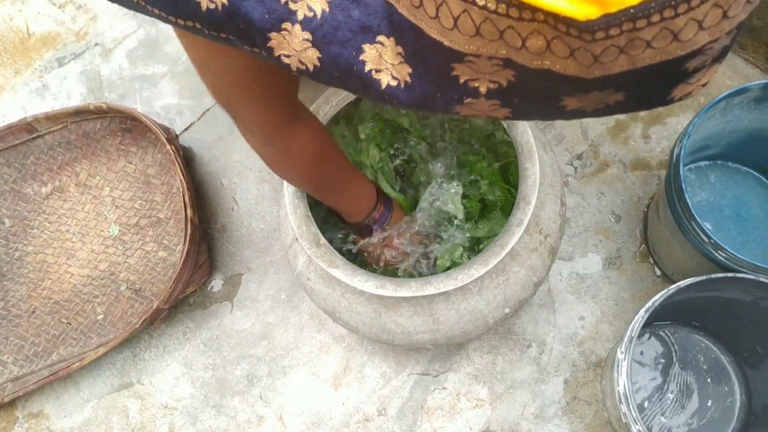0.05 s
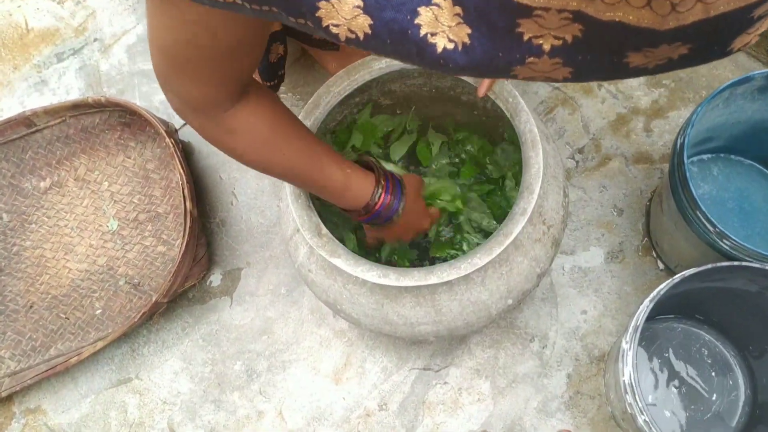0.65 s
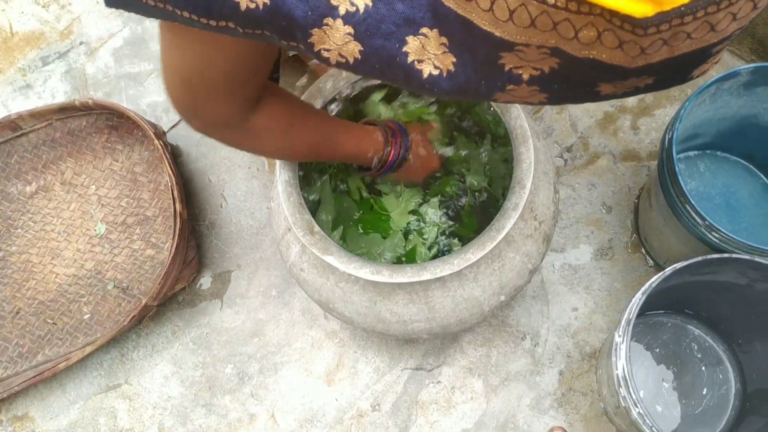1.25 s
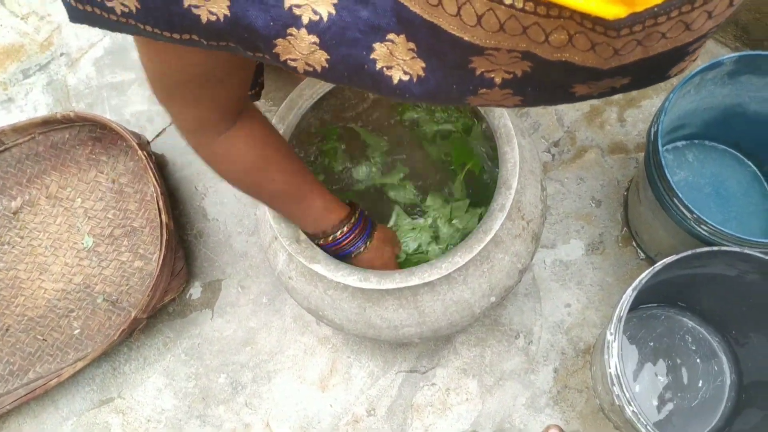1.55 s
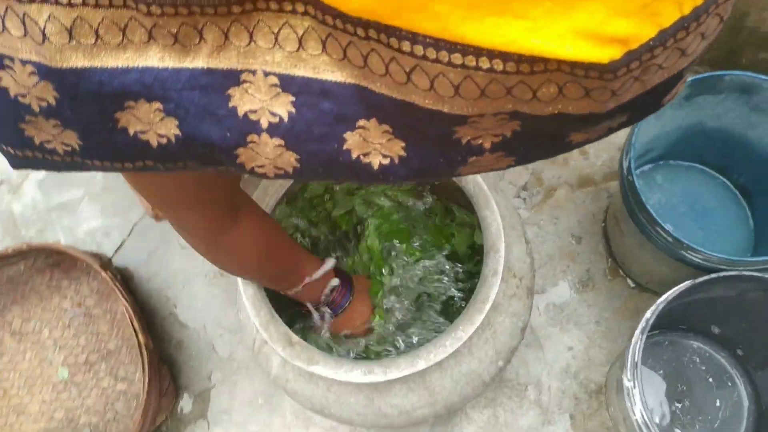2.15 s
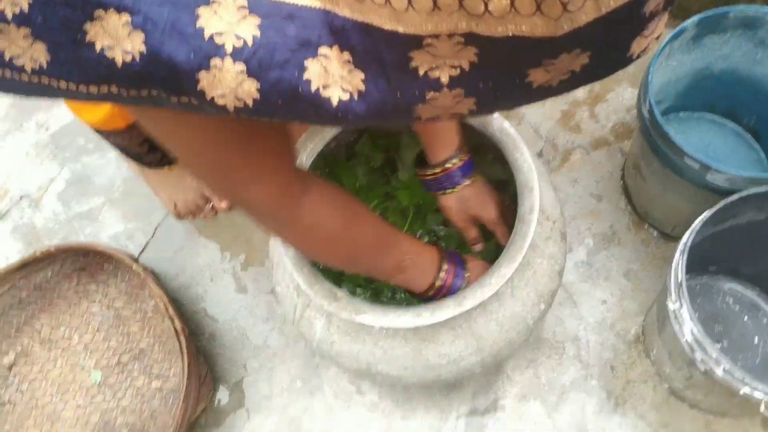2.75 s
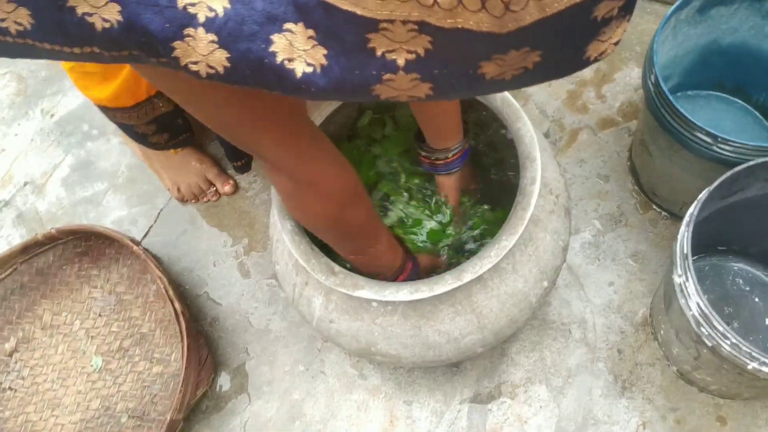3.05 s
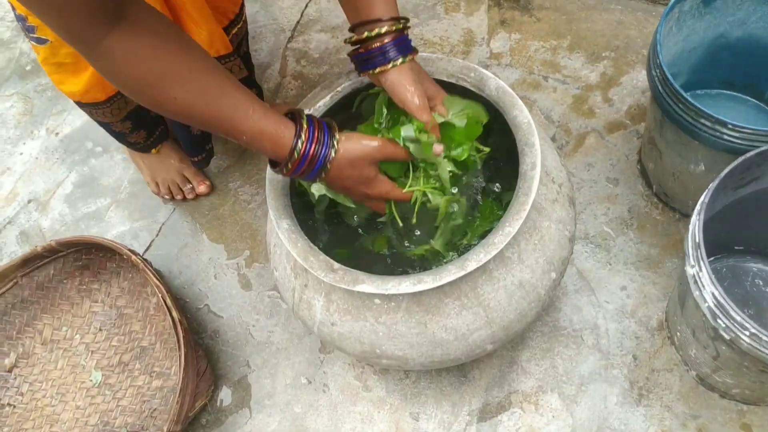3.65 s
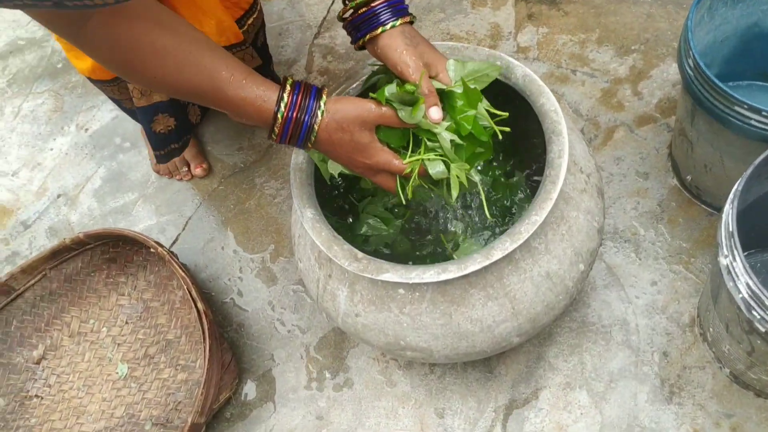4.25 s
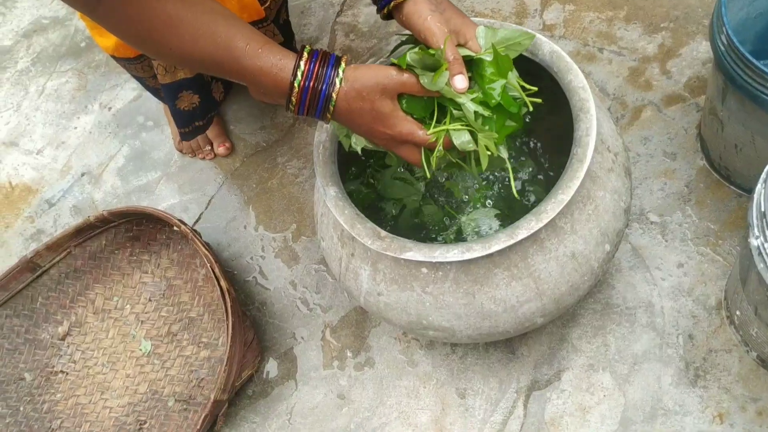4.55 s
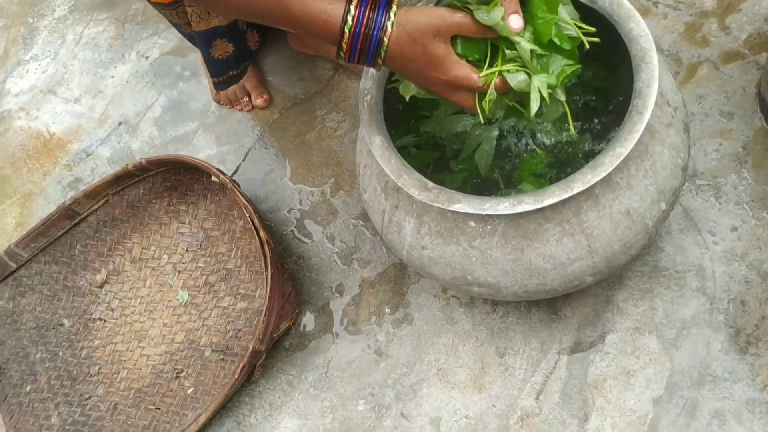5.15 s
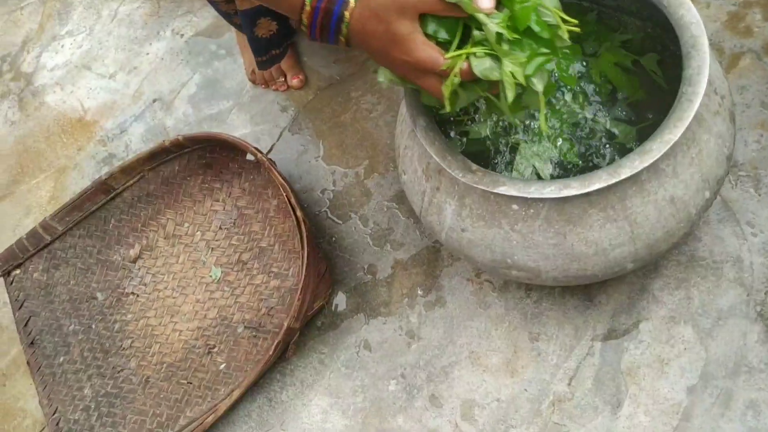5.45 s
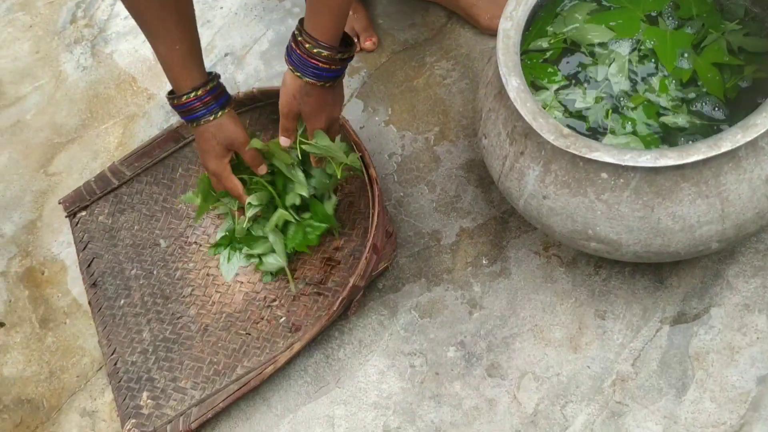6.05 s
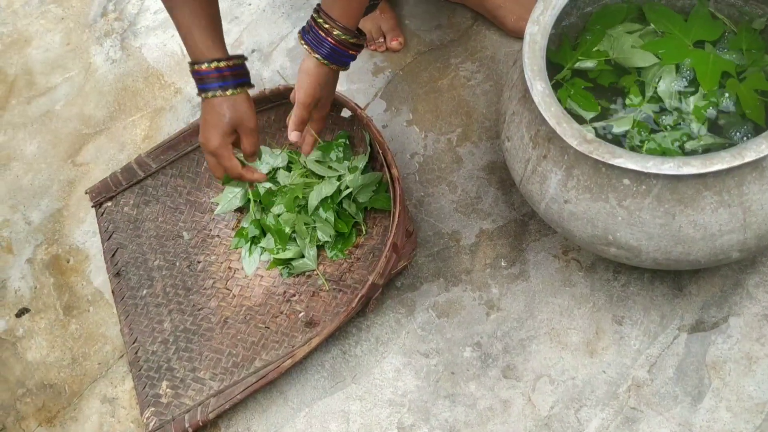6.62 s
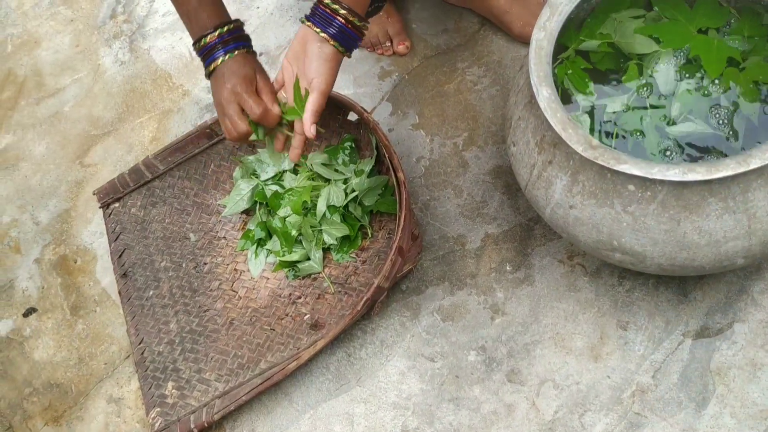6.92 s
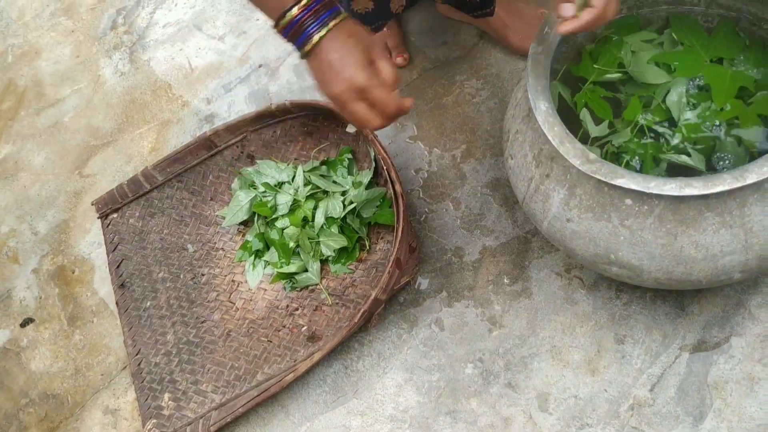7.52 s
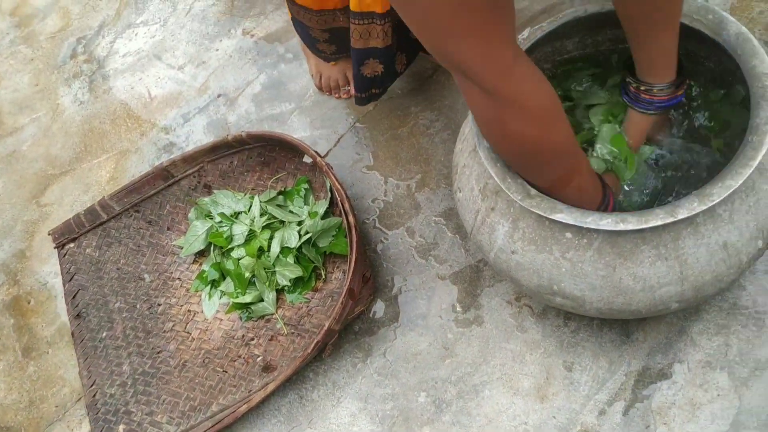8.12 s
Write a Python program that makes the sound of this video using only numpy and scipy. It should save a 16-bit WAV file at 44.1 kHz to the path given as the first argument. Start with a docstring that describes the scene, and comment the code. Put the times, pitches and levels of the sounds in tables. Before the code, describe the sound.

From the start, hands swish leaves in a large metal pot of water, heard close up in a yard over a low rumble and hiss. Uneven surges of bubbling, plops and bright splashes make the pot ring hollowly, with the loudest splashes near clipping. Thin bangles clink at about 1 and 2.9 seconds. Deeper gulps and a dull heave of water come between 3 and 3.6 seconds. Water then spatters back into the pot from a lifted bunch, thinning after 5 seconds to a few drips. At about 6.2 seconds the wet leaves land on a wicker tray with a short rustle. A quieter stretch follows, with faint leaf brushing, soft taps on the tray and bright bangle clinks and slides between 7 and 7.9 seconds. At 8 seconds the hands plunge back in with a loud, gurgling splash.

```python
"""Washing leaves in a metal pot

Hands swish leaves in a big pot of water in a yard; bubbles, spray and splashes set the pot ringing.
A dripping bunch is lifted out and dropped on a wicker tray. Wet bangles clink as the hands are
shaken, then the hands plunge back in. The close microphone clips on the loudest splashes."""
import sys
import numpy as np
from scipy import signal
from scipy.fft import rfft, irfft, next_fast_len
from scipy.io import wavfile
from scipy.ndimage import uniform_filter1d

SR = 44100
rng = np.random.default_rng(int(sys.argv[2]) if len(sys.argv) > 2 else 0)


def log_audio(samples):
    """Write samples as a 16-bit WAV file to the path given in sys.argv[1]."""
    # one column per channel
    frames = np.atleast_2d(samples).T
    # limit to full scale, then quantise
    limited = np.clip(frames, -1, 1)
    pcm = np.round(limited * 32767).astype(np.int16)
    wavfile.write(sys.argv[1], SR, pcm)


N = 365148
TIME = np.arange(N) / SR


def amp(db):
    """Decibels to gain."""
    return 10 ** (np.asarray(db) / 20)


def unit_rms(x):
    """Scales to rms 1."""
    return x / np.sqrt(np.mean(x ** 2) + 1e-20)


def add(mix, start_s, sound):
    """Mixes a sound in at start_s."""
    part = mix[max(round(start_s * SR), 0):][:len(sound)]
    part += sound[:len(part)]


def coloured(x, points):
    """Filters by a spectrum of (Hz, dB) points."""
    size = next_fast_len(len(x) + 1024)
    hz, db = np.transpose(points)
    gain = amp(np.interp(np.log(np.fft.rfftfreq(size, 1 / SR) + 1), np.log(hz), db))
    return irfft(rfft(x, size) * gain, size)[:len(x)]


def hump(centre_hz, width_oct):
    """Rounded passband, tilted down above 1 kHz, as (Hz, dB) points."""
    hz = np.geomspace(25, 12000, num=40)
    band_db = -10 * np.log10(1 + (np.log2(hz / centre_hz) / width_oct) ** 4)
    return np.transpose([hz, band_db - 1.5 * np.log2(np.maximum(hz, 1000))])


def crackle(per_s, spread_db, wash):
    """Tiny impacts of uneven size over a wash of noise."""
    sizes = amp(spread_db * np.minimum(rng.exponential(1, N), 4)) * rng.choice([-1, 1], N)
    impacts = unit_rms(sizes * (rng.random(N) < per_s / SR))
    return unit_rms(impacts + wash * rng.standard_normal(N))


def held(t, length_s, attack_s, release_s):
    """Envelope: rises from t = 0, holds, decays."""
    t = np.maximum(t, 0)
    return (1 - np.exp(-t / attack_s)) * np.exp(-np.maximum(t - length_s, 0) / release_s)


def burst(grain, start_s, length_s, fall_s):
    """Slice of grain with a sharp attack, hold and decay."""
    piece = grain[max(round(start_s * SR), 0):][:SR // 4]
    return piece * held(np.arange(len(piece)) / SR, length_s, attack_s=0.00028, release_s=fall_s)


def puffs(rows, width_oct, fall_s):
    """Soft blows: bursts of band noise."""
    out = np.zeros(N)
    for start_s, db, length_s, centre_hz in rows:
        noise = unit_rms(coloured(rng.standard_normal(SR // 4), hump(centre_hz, width_oct)))
        add(out, start_s, amp(db) * burst(noise, 0, length_s, fall_s))
    return out


def swells(rows):
    """Envelope of rubbing movements that each peak and fade."""
    return sum(amp(db) * np.exp(-np.maximum((peak_s - TIME) / rise_s, (TIME - peak_s) / fall_s))
               for peak_s, db, rise_s, fall_s in rows)


def yard(base_db=-33.5):
    """Outdoor rumble and hiss; the background dips around 2.8 s and rises after 5.3 s, once the stirring stops."""
    # Each row: frequency in Hz, level in dB.
    spectrum = [(18, -61), (30, -13), (70, 5.5), (206, -4.5), (415, -10.5), (739, -11.5), (814, -11),
                (1350, -14), (2240, -12.5), (3140, -11), (4290, -12), (8840, -16), (9500, -16.5),
                (12400, -39), (20900, -120)]
    # Each row: time in seconds, offset in dB.
    drift = [(0, 4.5), (2.8, -5.5), (4.5, 2.5), (5.25, 1), (5.36, 6), (6.2, 6), (6.4, 4.5), (7.5, 4.5),
             (8.28, 3)]
    gain = amp(base_db + np.interp(TIME, *np.transpose(drift)))
    return gain * unit_rms(coloured(rng.standard_normal(N), spectrum))


def agitation(attack_s=0.0099, flutter_db=2.15, flutter_s=0.02):
    """Gulping, bubbling and spray gains: hand strokes and run-off surge over gentle early lapping."""
    # Each row: start in seconds, length in seconds, bubbling in dB, gulp and spray offsets in dB.
    surges = [(0, .19, -16, -7, 1), (0.208, 0.17, -17, -10, -3), (0.331, 0.21, -17.5, -6, 0.5),
              (0.642, 0.11, -20.5, -24, 0), (0.887, 0.051, -20, 3, 3), (1.017, 0.35, -30.5, -2, -6),
              (1.162, 0.074, -19.5, -4, -3.5), (1.32, 0.052, -29, 1, -12), (1.378, 0.17, -20.5, -16, 0),
              (1.54, 0.14, -26, -5, -4), (1.79, 0.093, -23, -16, 2), (1.895, 0.071, -14, -9, -5),
              (2.026, 0.27, -15.5, -7.5, -0.5), (2.415, 0.15, -16, -3, -1), (2.613, 0.082, -34.5, -25, 5),
              (2.751, 0.017, -24.5, -23, 1), (2.8, 0.045, -28, -25, 3), (2.897, 0.09, -22.5, -12, -8),
              (3.067, 0.2, -18.5, 3.5, -34), (3.297, 0.35, -22, 2.5, -0.5), (3.691, 0.28, -26, -4.5, 3.5),
              (3.963, 0.16, -19, -2, 1.5), (4.165, 0.083, -23, -25, 2), (4.332, 0.1, -24.5, -3.5, 2),
              (4.57, 0.016, -22.5, -16, 1), (4.664, 0.097, -31.5, -11, 1.5), (4.824, .05, -29.5, 3, 3.5),
              (4.881, .11, -20.5, -8, -2), (5.158, 0.029, -37, -27.5, 6.5), (7.998, 0.056, -18.5, -7, -3),
              (8.056, 0.078, -14, -5.5, -6), (8.124, 0.14, -12.5, -2, -4)]
    lapping = held(TIME, 2.6, attack_s, release_s=0.15)
    power = np.outer(amp([-45.5, -33, -37]), lapping) ** 2
    for start_s, length_s, db, gulp_db, spray_db in surges:
        surge = held(TIME - start_s, length_s, attack_s, release_s=0.048)
        power += np.outer(amp([db + gulp_db, db, db + spray_db]), surge) ** 2
    knots_s = np.arange(0, N / SR + flutter_s, flutter_s)
    tumbling = np.interp(TIME, knots_s, rng.standard_normal(N)[:len(knots_s)])
    return np.sqrt(power) * amp(flutter_db * tumbling)


def bubble(hz, t60_s, rise, attack_cycles):
    """An air pocket rings and climbs in pitch as it nears the surface."""
    t = np.arange(int(max(t60_s, 0.002) * SR)) / SR
    turns = hz * (t + rise * t ** 2 / (2 * t60_s))
    return np.sin(2 * np.pi * turns) * amp(-60 * t / t60_s) * (1 - np.exp(-turns / attack_cycles))


def bubble_cloud(gain, low_hz, high_hz, cycles, rise, spread_db, count):
    """Bubbles of random size, each scaled by the gain at its birth; small ones die sooner."""
    out, energy = np.zeros(N), 0
    for k, (jitter, size, strength, sustain, depth) in enumerate(rng.random((count, 5))):
        born = int((k + jitter) / count * (N - 1))
        hz = low_hz * (high_hz / low_hz) ** size
        t60_s = cycles * (0.5 + sustain) / hz
        ring = bubble(hz, t60_s, rise * depth, attack_cycles=0.24 * cycles)
        ring *= amp(spread_db * strength ** 2) * np.sqrt(hz)
        energy += np.sum(ring ** 2)
        add(out, born / SR, gain[born] * ring)
    return out / np.sqrt(energy / N)


def stirring():
    """Hands fold air into the water: gulps, bubble chatter, spray and, when stirred hard, a gush."""
    # Each row of both: frequency in Hz, spectral density in dB.
    spray_spectrum = [(300, -26), (1200, -90), (2200, -16), (3300, 11), (5000, 10.5), (7000, 8.5),
                      (9000, 14.5), (11000, 3.5)]
    gush_spectrum = [(400, -59), (900, 6), (1200, 3.5), (1800, 11), (2200, 0), (3200, 5.5), (4300, -3.5),
                     (6000, -10), (10000, -34)]
    deep, mid, fine = agitation()
    gulps = bubble_cloud(deep * amp(-10), 211, 457, cycles=6.5, rise=0.31, spread_db=12, count=600)
    glugs = bubble_cloud(deep * amp(-1), 590, 1132, cycles=25.3, rise=0.077, spread_db=4.2, count=1400)
    chatter = bubble_cloud(mid * amp(-5.5), 1090, 2030,
                           cycles=11.7, rise=0.055, spread_db=34.5, count=2000)
    tinkle = bubble_cloud(mid * amp(-4), 2332, 4640, cycles=28.6, rise=0.023, spread_db=20, count=3200)
    fizz = bubble_cloud(fine * amp(-5), 4625, 9510, cycles=50, rise=0.051, spread_db=23, count=4500)
    spray = unit_rms(coloured(crackle(per_s=4200, spread_db=12.5, wash=1), spray_spectrum))
    gush = unit_rms(coloured(crackle(per_s=3000, spread_db=1.54, wash=0.71), gush_spectrum))
    bubbles = gulps + glugs + chatter + tinkle + fizz
    return bubbles + fine * amp(-3) * spray + mid ** 1.46 * amp(6.5) * gush


def splashes(width_oct=0.92, fall_s=0.0059):
    """Each slap of water shatters into drops and a swarm of tiny bubbles."""
    # Each row: start in seconds, level in dB, length in seconds, band centre in Hz.
    slaps = [(.004, -0.5, 0.0018, 3080), (0.106, -6.5, 0.033, 3900), (.291, -4, 0.0093, 4450),
             (.348, -10, 0.0055, 5940), (0.45, -6, 0.019, 3530), (0.476, -3.5, 0.0057, 4150),
             (0.517, -6.5, 0.0067, 6750), (0.592, -5.5, 0.017, 4250), (0.705, -8, 0.012, 6310),
             (0.894, 0.5, 0.031, 5400), (1.186, -9, 0.027, 5300), (1.408, -5, 0.0026, 7900),
             (1.626, 2, 0.027, 6150), (1.688, -4.5, .015, 6700), (1.894, -6.5, 0.033, 4670),
             (2.044, -13.5, 0.05, 3800), (2.185, -3.5, .033, 4950), (2.251, -3, 0.02, 6100),
             (2.431, 2.5, 0.013, 5150), (2.518, -5, 0.029, 4160), (2.904, -10.5, 0.029, 8500),
             (3.166, -13, 0.014, 2780), (3.286, -13.5, .0067, 3940), (3.32, -15, 0.011, 5000),
             (3.412, -12, 0.014, 4240), (3.537, -5.5, .0052, 6250), (3.568, -2.5, 0.048, 5060),
             (4.005, -11, .012, 7960), (4.189, -5, .008, 8300), (4.209, -11, 0.012, 7160),
             (4.232, -12, 0.021, 4050), (4.362, -7.5, 0.0049, 6230), (4.396, -11, 0.0091, 5200),
             (4.428, -10.5, 0.013, 3300), (4.637, -4.5, 0.0089, 7200), (4.781, -17.5, 0.0041, 8500),
             (4.932, -9.5, .006, 5020), (4.967, -10, .009, 2730), (5.1003, -9.5, 0.0022, 6350),
             (5.169, -19, 0.0032, 6500), (5.322, -19.5, 0.027, 6900), (5.662, -16.5, .005, 6460),
             (5.81, -20, 0.0067, 7500), (8.194, -4.5, 0.017, 6130)]
    out = np.zeros(N)
    swarm = bubble_cloud(np.ones(N), 1741, 10200, cycles=50, rise=0.11, spread_db=38, count=4000)
    grain = crackle(per_s=5000, spread_db=3, wash=0.4) + 0.33 * swarm
    for start_s, db, length_s, centre_hz in slaps:
        slap = coloured(burst(grain, start_s, length_s, fall_s), hump(centre_hz, width_oct))
        rms = np.sqrt(np.sum(slap ** 2) / ((length_s + fall_s / 2) * SR))
        add(out, start_s, amp(db) * slap / rms)
    return out


def plops(t60_at_1khz_s=0.066):
    """Single bubbles that stand out, from deep plops to high drips."""
    # Each row: start in seconds, pitch in Hz, relative level in dB.
    bubbles = [(.005, 338, -7.5), (.065, 1120, -12.5), (.118, 1813, 4), (.119, 945, -7), (.252, 969, -6),
               (.343, 392, -12), (.381, 398, -8.5), (.45, 1505, 2.5), (.473, 1836, 0.5), (0.564, 335, -10),
               (0.748, 1790, -4.5), (.802, 1680, -7.5), (0.972, 1710, -10), (1.074, 1600, -14),
               (1.12, 3000, -13.5), (1.254, 3500, -4.5), (1.44, 1465, -7), (1.5, 1682, -3),
               (1.529, 640, -17), (1.633, 1696, -3.5), (1.963, 344, -13), (1.994, 306, -10.5),
               (2.211, 924, -1.5), (2.3, 275.6, -8.5), (2.323, 273, -9.5), (2.441, 1464, 2.5),
               (2.558, 931, -12), (2.762, 1020, -21.5), (2.804, 2584, -15), (2.973, 2090, -16),
               (3.074, 700, -19), (3.082, 713, -1), (3.091, 734, 4.5), (3.138, 310, -8), (3.164, 334, -6.5),
               (3.173, 743, -7), (3.242, 1643, -3.5), (3.339, 927, -7.5), (3.376, 840, -4.5),
               (3.403, 1020, -4), (3.415, 3810, 0.5), (3.456, 1396, -6), (3.51, 1330, -6.5),
               (3.534, 868, -6), (3.573, 3860, 2), (4.022, 3530, -7), (4.248, 387, -16),
               (4.267, 615, -16.5), (4.332, 3880, -7.5), (4.356, 1405, -10.5), (4.368, 5750, -1.5),
               (4.429, 1716, -5.5), (4.449, 794, -4.5), (4.455, 744, 5.5), (4.515, 1450, -16.5),
               (4.585, 4020, -11), (4.617, 3260, -10.5), (4.668, 3080, -14), (4.875, 3260, -11),
               (4.902, 1755, -2.5), (4.941, 1346, -5), (4.968, 1828, -3.5), (5.099, 3265, -10.5),
               (5.192, 2310, -9), (5.402, 3520, -12.5), (5.468, 3360, -21.5), (5.591, 3077, -8.5),
               (5.663, 4700, -17), (8.062, 641, -8.5), (8.139, 757, -1.5), (8.156, 1248, 3),
               (8.177, 1443, 2.5), (8.222, 673, -6), (8.261, 647, -4)]
    out = np.zeros(N)
    for start_s, hz, db in bubbles:
        t60_s = t60_at_1khz_s * (1000 / hz) ** 0.77
        add(out, start_s, amp(db + 3) * bubble(hz, t60_s, rise=0.027, attack_cycles=0.44))
    return out


def pot_belly(water, t60_s=0.048, spacing_s=0.0014):
    """Sound bounces around the pot's round belly."""
    response = np.zeros(SR // 8)
    for k in range(32):
        delay_s = (k + 1 + rng.random()) * spacing_s
        response[int(delay_s * SR)] = rng.choice([-1, 1]) * amp(-60 * delay_s / t60_s)
    return signal.fftconvolve(water, response / np.linalg.norm(response))[:N]


def pot_ring(water):
    """Water drives the modes of the pot's wall and of the air inside."""
    # Each row: frequency in Hz, relative level in dB, t60 in seconds.
    modes = [(188.7, -1, 2.7), (272, -20, 0.5), (386, -17, 0.23), (491.3, 4, 1.8), (546, -23, 0.35),
             (536, -34, 0.44), (621, -17, 0.24), (687.3, 2, 0.29), (699.3, 8, 0.12), (883, -27.5, 0.7),
             (942, -32, 0.64), (930, -15, 0.2), (995, 3, 0.39), (1175, -1, 0.083), (1190, -11, 0.28),
             (1279, 2, 0.33), (1557, 2.5, 0.38)]
    t = np.arange(SR) / SR
    response = sum(amp(db) * np.sin(2 * np.pi * hz * t) * amp(-60 * t / t60_s) / np.sqrt(t60_s)
                   for hz, db, t60_s in modes)
    return amp(31.5) / SR * signal.fftconvolve(water, response)[:N]


def wall_echoes(x, t60_s=0.41, delay_s=0.006, per_s=3000):
    """Sparse, decaying reflections off the yard walls."""
    t = np.arange(SR // 2) / SR
    reflections = rng.choice([-1, 1], len(t)) * (rng.random(len(t)) < per_s / SR)
    response = reflections * (t > delay_s) * amp(-60 * t / t60_s)
    return signal.fftconvolve(x, response / np.linalg.norm(response))[:N]


def heaving():
    """Water heaves in the pot with dull thumps."""
    # Each row: start in seconds, level in dB, length in seconds, band centre in Hz.
    thumps = [(.2, -20, 0.21, 322), (.42, -21, 0.19, 308), (.9, -27.5, 0.023, 192), (1.622, -35, 0.02, 141),
              (1.95, -24.5, 0.13, 337), (2.25, -21, 0.16, 302), (2.432, -13.5, 0.0087, 204),
              (3.14, -37, 0.08, 350), (3.42, -10, 0.032, 145), (3.58, -29, 0.024, 188),
              (4.885, -21.5, 0.13, 231), (8.205, -12, 0.077, 388)]
    return puffs(thumps, width_oct=0.27, fall_s=0.039)


def bangles():
    """Thin bangles knock together and slide along the wrist; longer clinks settle more slowly."""
    # Each row: frequency in Hz, level in dB.
    spectrum = [(1000, -28), (4000, -16), (5000, -10.5), (5750, -2.5), (6200, -6.5), (6600, -1), (7700, -4),
                (8600, 4.5), (9200, 0), (10000, -2.5), (11000, 3.5)]
    # Each row: start in seconds, relative level in dB, length in seconds.
    clinks = [(1.022, -6, 0.0027), (2.805, -11, 0.0037), (2.884, 1.5, 0.0028), (5.3575, -9.5, .004),
              (6.007, -3.5, 0.0025), (6.604, -24.5, .0045), (7.2855, 1, 0.0014), (7.343, -10, 0.0086),
              (7.372, -9.5, 0.0052), (7.802, -3.5, 0.0026), (7.85, -2.5, 0.006), (8.046, -9, 0.013)]
    # Each row: peak time in seconds, level in dB, rise and fall in seconds.
    slides = [(6.67, -24, 0.035, .03), (7.05, -1, 0.026, 0.019), (7.3, -13.5, 0.024, 0.031),
              (7.846, -3.5, 0.029, 0.019)]
    out = np.zeros(N)
    chatter = unit_rms(coloured(crackle(per_s=3700, spread_db=3.9, wash=0.68), spectrum))
    for start_s, db, length_s in clinks:
        clink = burst(chatter, start_s, length_s, fall_s=0.004 + 0.85 * length_s)
        add(out, start_s, amp(db + 3.5) * clink)
    return out + swells(slides) * chatter


def leaves():
    """Wet leaves brush each other and land on the wicker."""
    # Each row: peak time in seconds, level in dB, rise and fall in seconds.
    rustles = [(6.15, -21.5, 0.22, 0.027), (6.218, -2, .012, 0.0088), (6.25, -8.5, 0.013, .016),
               (6.3, -13, 0.036, 0.026), (6.68, -27, 0.047, 0.046), (7.05, -31, 0.11, 0.1)]
    # Each row: frequency in Hz, level in dB.
    spectrum = [(47, -49), (80, -6), (182, -23), (240, 3), (318, -10), (396, 2.5), (898, -3), (1340, -1),
                (1570, -6), (3040, -5), (9500, -11.5), (12400, -30), (20900, -120)]
    return swells(rustles) * unit_rms(coloured(crackle(per_s=3000, spread_db=1.9, wash=0.99), spectrum))


def tray_taps():
    """Soft taps on the wicker tray."""
    # Each row: start in seconds, level in dB, length in seconds, band centre in Hz.
    taps = [(6.476, -31, 0.009, 1140), (6.775, -32.5, 0.012, 1880), (7.378, -22.5, 0.0086, 1100)]
    return puffs(taps, width_oct=0.44, fall_s=0.016)


def suppressor(x, floor_db=-62, depth_db=13, follow_db=-14, memory_s=0.32):
    """Turns down faint time-frequency patches; the threshold lags high after loud sound."""
    spectra = signal.stft(x, nperseg=512, noverlap=384)[2]
    power = uniform_filter1d(abs(spectra) ** 2, size=5, axis=0)
    power = abs(uniform_filter1d(power, size=7, axis=1))
    pole = np.exp(-(N / SR) / spectra.shape[1] / memory_s)
    recent = signal.lfilter([1 - pole], [1, -pole], power, axis=1)
    threshold = amp(floor_db) ** 2 + amp(follow_db) ** 2 * recent
    faintness = 1 / (1 + power / threshold)
    return signal.istft(spectra * amp(-depth_db * faintness), nperseg=512, noverlap=384)[1][:N]


def scene():
    """Water echoes and rings in the pot; the yard walls return a little of every close sound."""
    churn, slaps, drops, heaves = stirring(), splashes(), plops(), heaving()
    direct = amp(-0.5) * churn + amp(-2.5) * (slaps + drops) + heaves
    hollow = amp(-3.5) * pot_belly(churn + amp(-16.5) * slaps + amp(-1) * drops)
    ring = pot_ring(amp(-1) * churn + amp(6) * slaps + amp(1.5) * drops + heaves)
    near = direct + hollow + ring + bangles() + leaves() + tray_taps()
    return (near + amp(-12.5) * wall_echoes(near) + yard())[None]


def record(dry, hiss_db=-67.5, ceiling=0.96, cutoff_hz=15700):
    """Suppressor, microphone colour and self-noise, peak clipping, band limit."""
    # Each row: frequency in Hz, gain in dB.
    mic_response = [(20, -17), (9300, 2.5), (9900, -3.5), (10500, -11.5), (11200, -30.5), (12000, -89),
                    (15000, -59)]
    heard = coloured(suppressor(dry[0]), mic_response) + amp(hiss_db) * rng.standard_normal(N)
    clipped = np.clip(heard, -ceiling, ceiling)
    lowpass = signal.firwin(401, cutoff_hz, window=("kaiser", 7), fs=SR)
    return signal.oaconvolve(clipped, lowpass, "same")[None]


dry = scene()
out = record(dry)
log_audio(out)
```